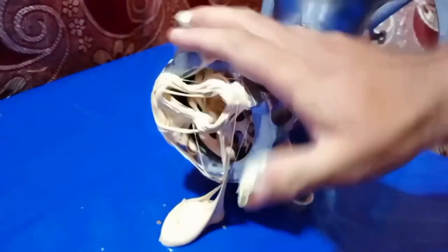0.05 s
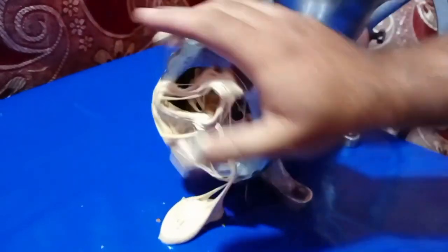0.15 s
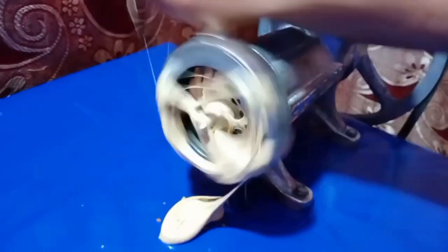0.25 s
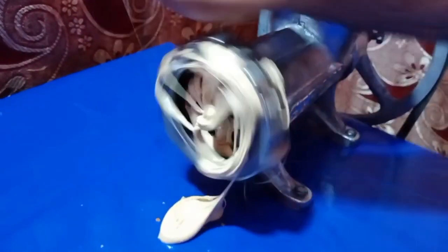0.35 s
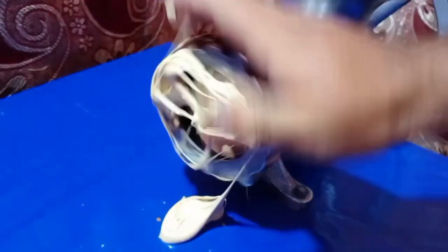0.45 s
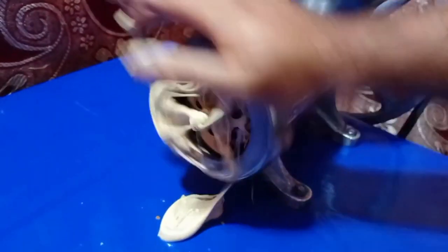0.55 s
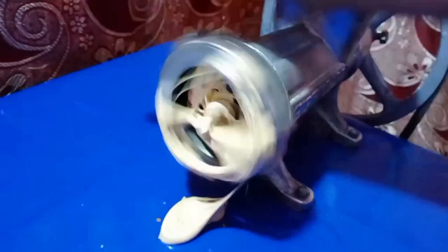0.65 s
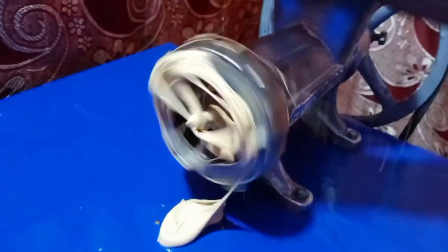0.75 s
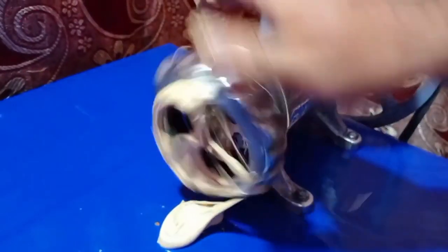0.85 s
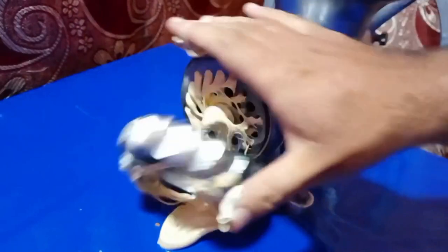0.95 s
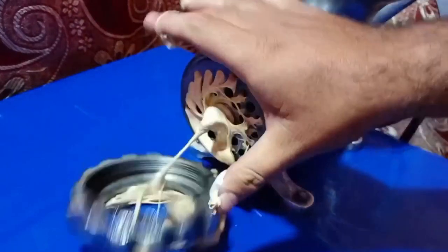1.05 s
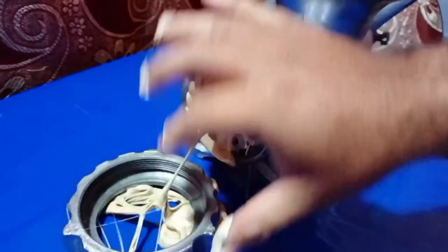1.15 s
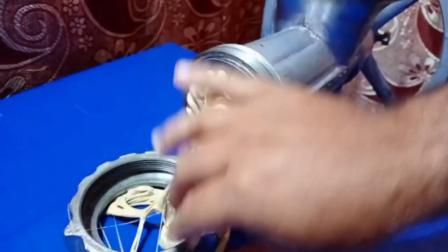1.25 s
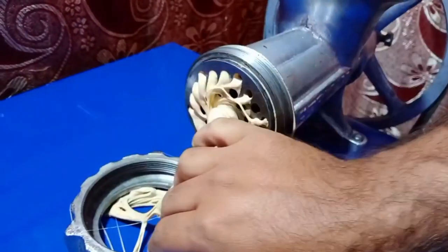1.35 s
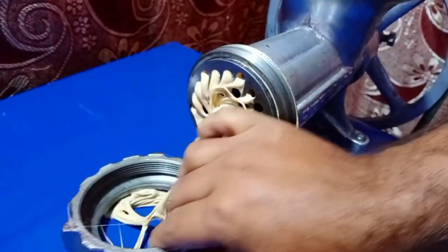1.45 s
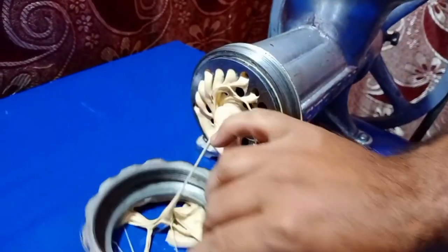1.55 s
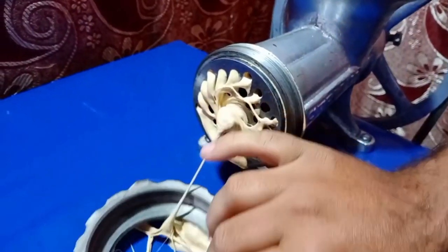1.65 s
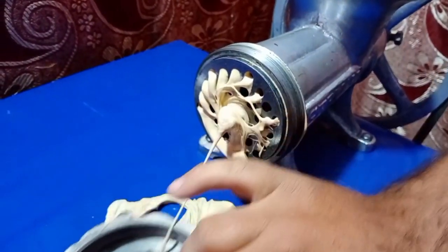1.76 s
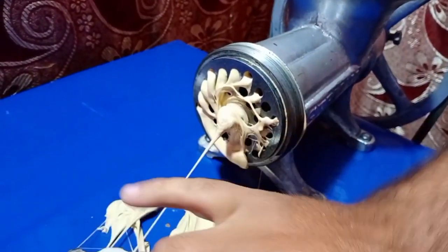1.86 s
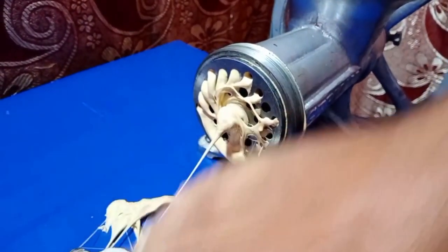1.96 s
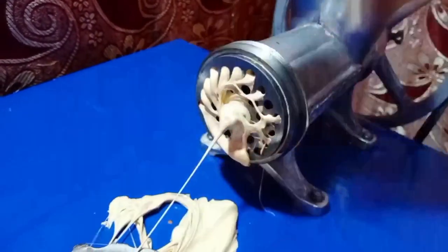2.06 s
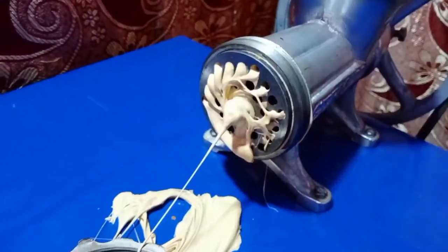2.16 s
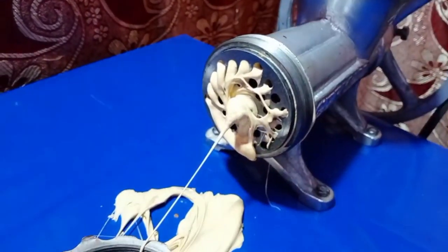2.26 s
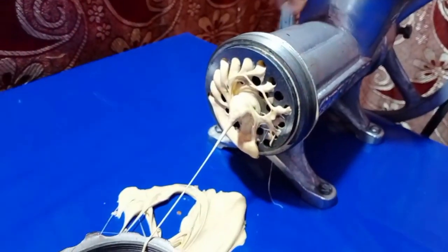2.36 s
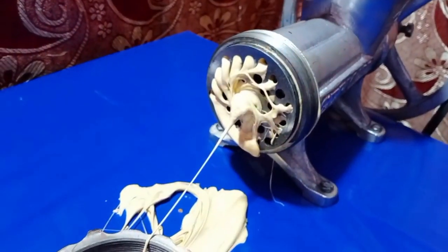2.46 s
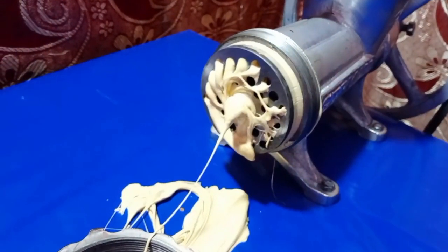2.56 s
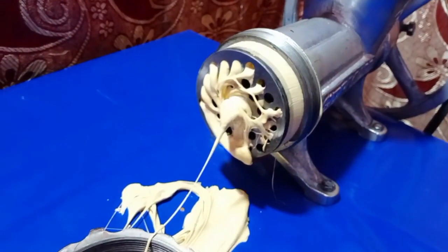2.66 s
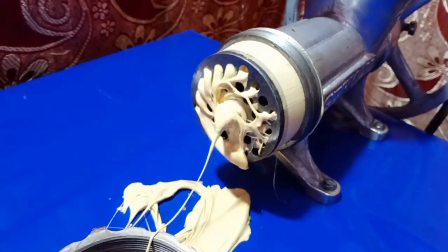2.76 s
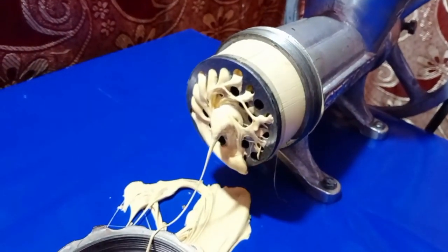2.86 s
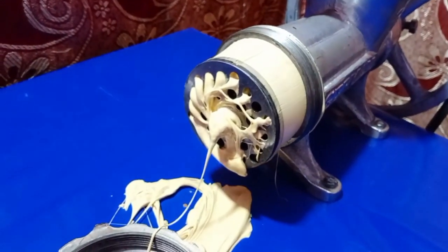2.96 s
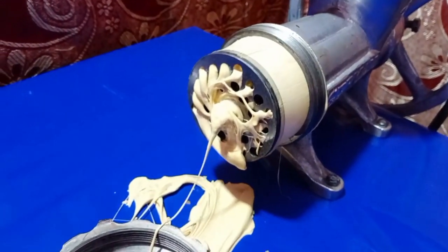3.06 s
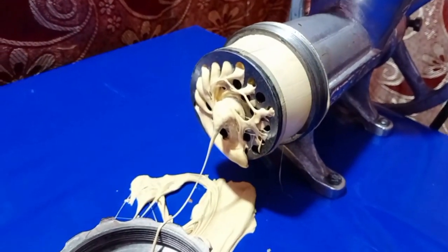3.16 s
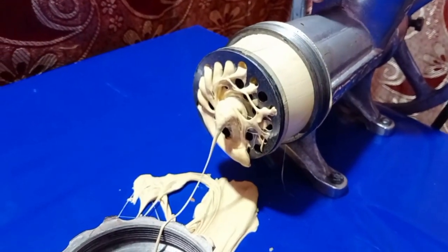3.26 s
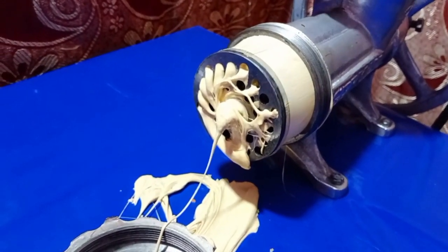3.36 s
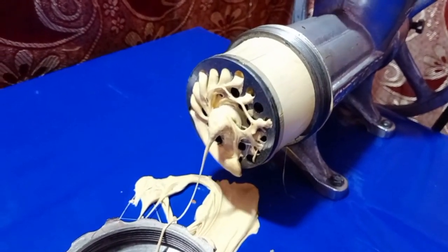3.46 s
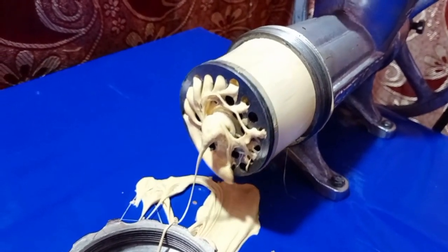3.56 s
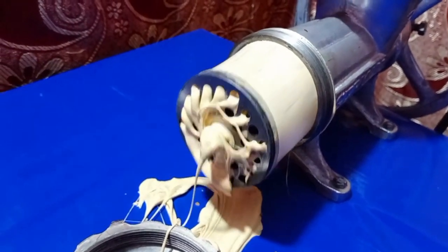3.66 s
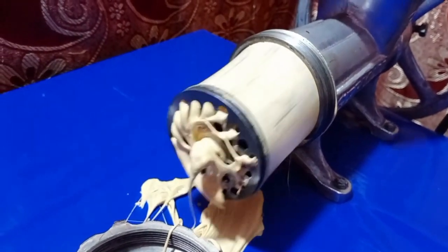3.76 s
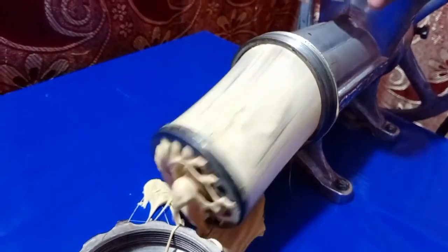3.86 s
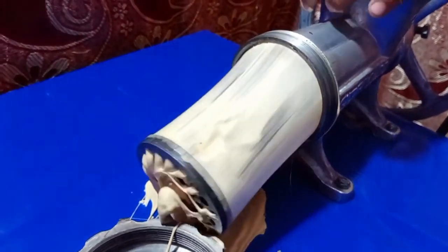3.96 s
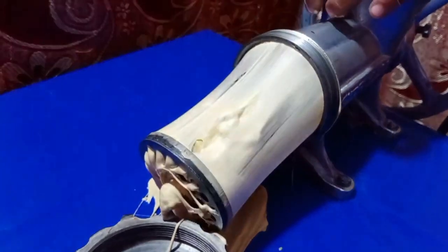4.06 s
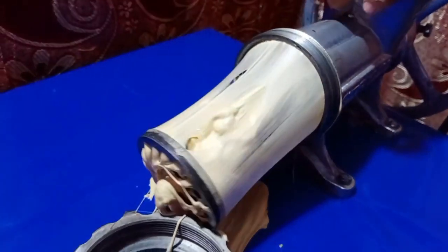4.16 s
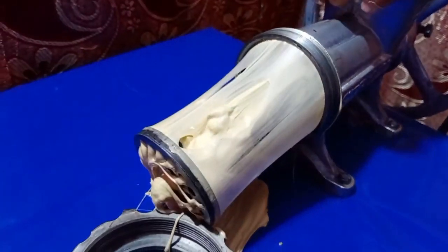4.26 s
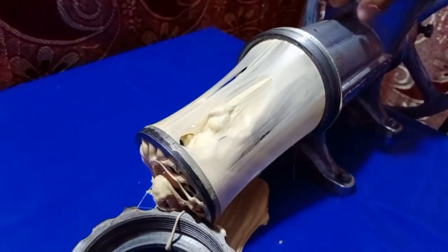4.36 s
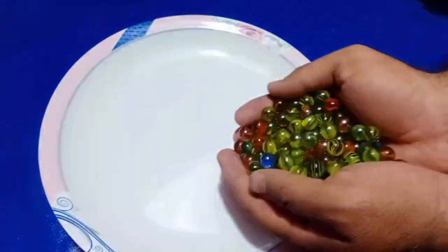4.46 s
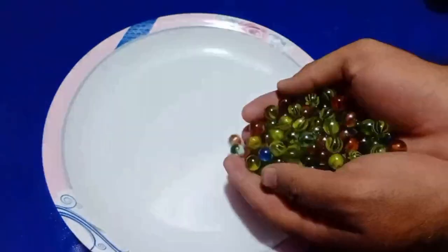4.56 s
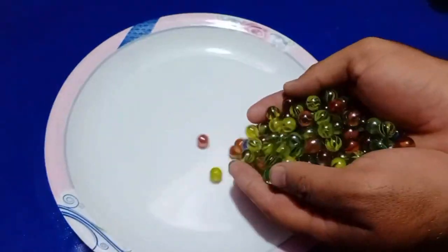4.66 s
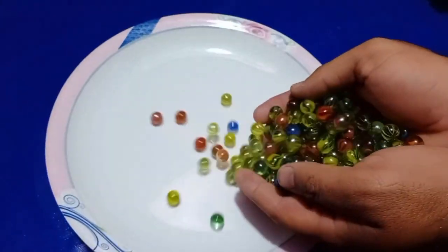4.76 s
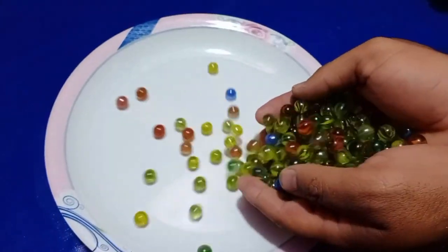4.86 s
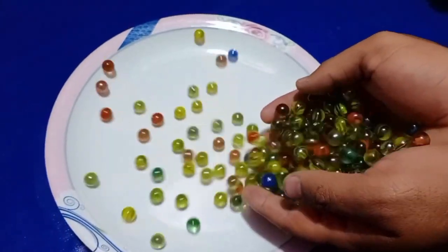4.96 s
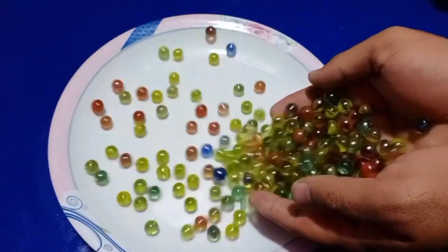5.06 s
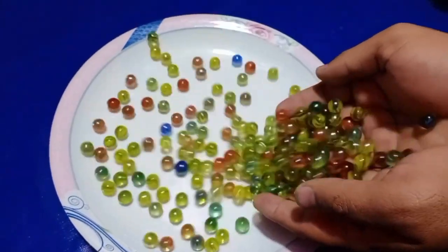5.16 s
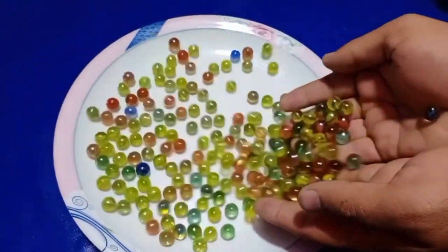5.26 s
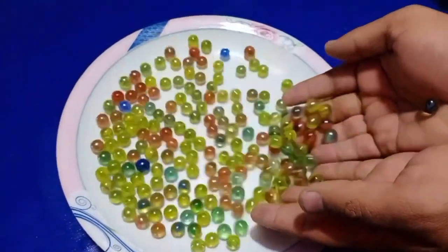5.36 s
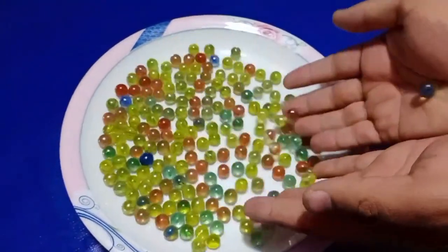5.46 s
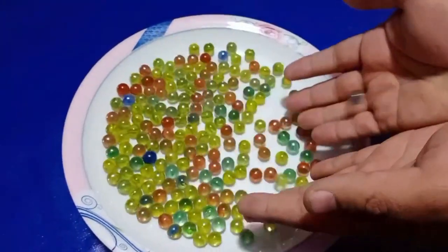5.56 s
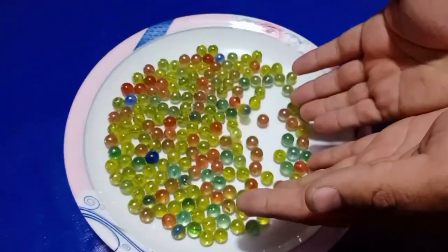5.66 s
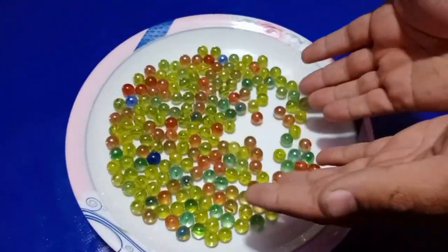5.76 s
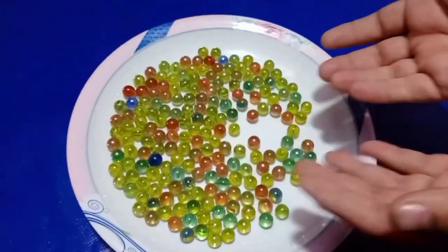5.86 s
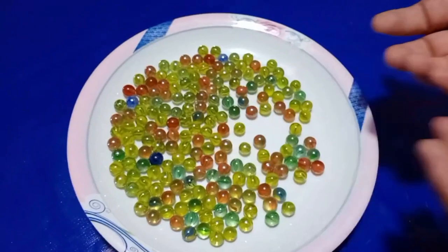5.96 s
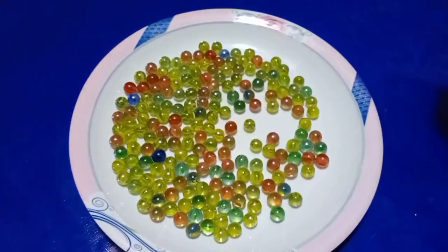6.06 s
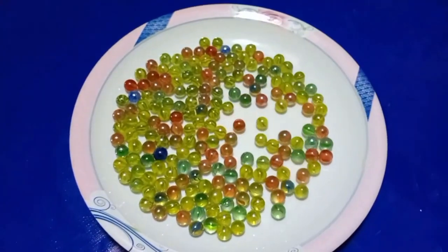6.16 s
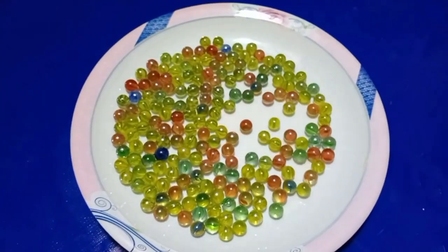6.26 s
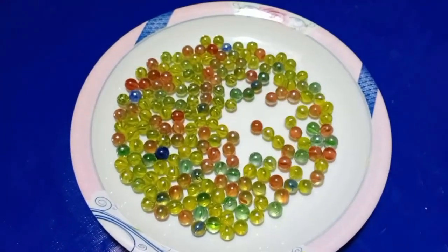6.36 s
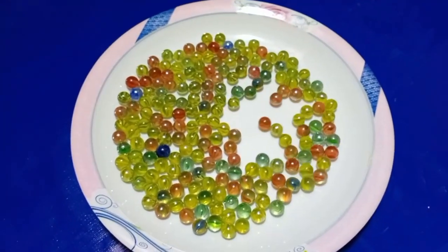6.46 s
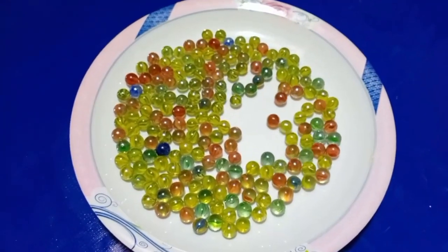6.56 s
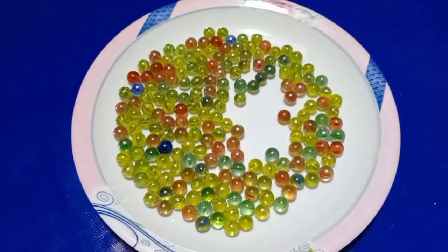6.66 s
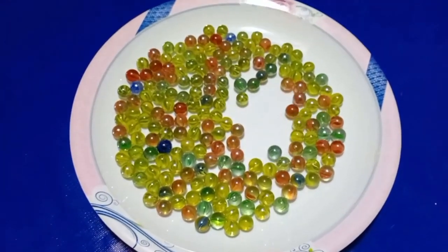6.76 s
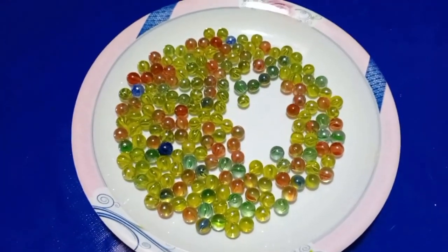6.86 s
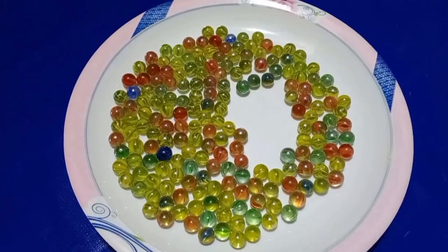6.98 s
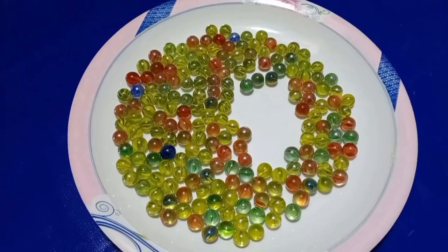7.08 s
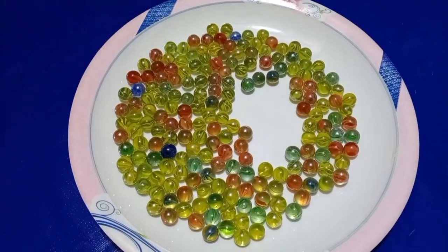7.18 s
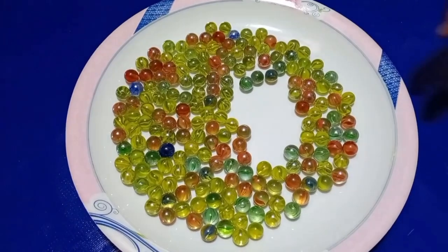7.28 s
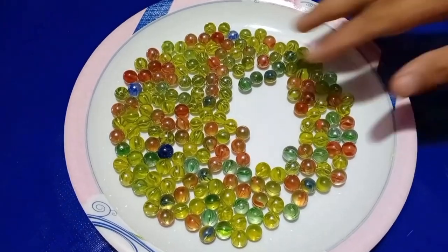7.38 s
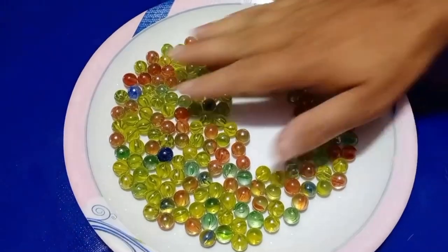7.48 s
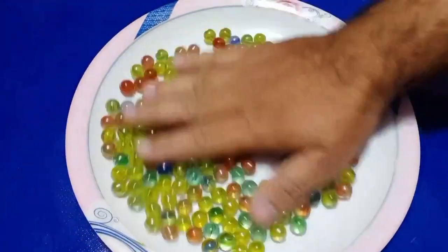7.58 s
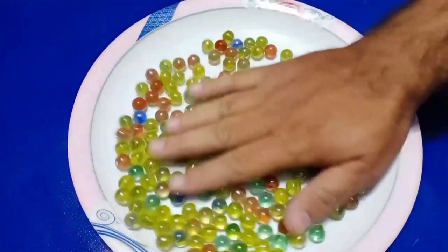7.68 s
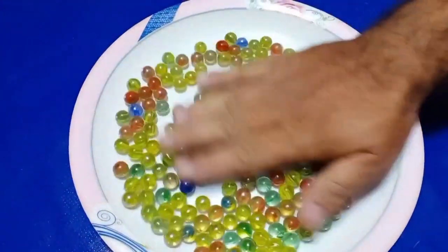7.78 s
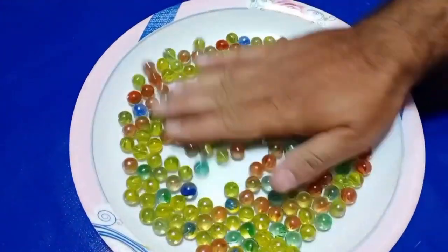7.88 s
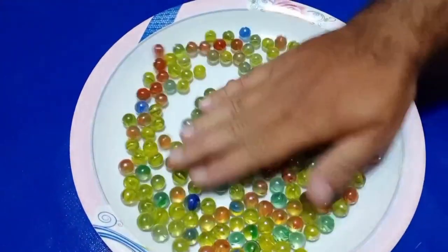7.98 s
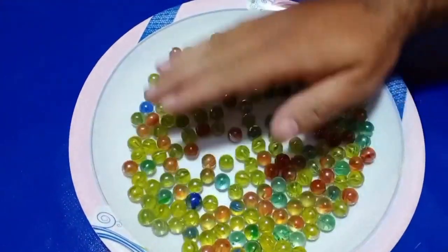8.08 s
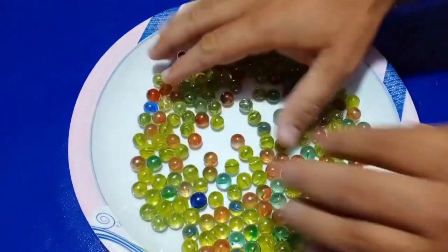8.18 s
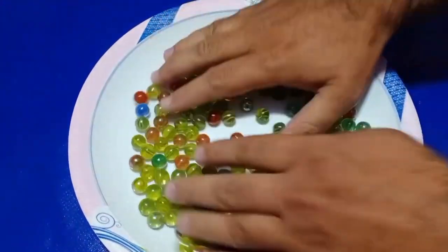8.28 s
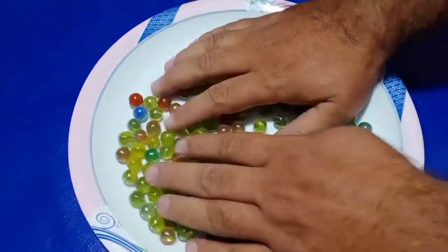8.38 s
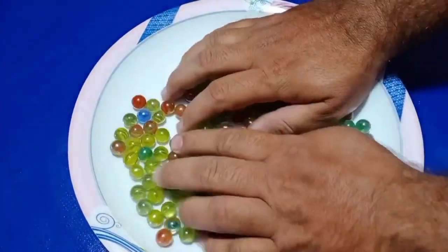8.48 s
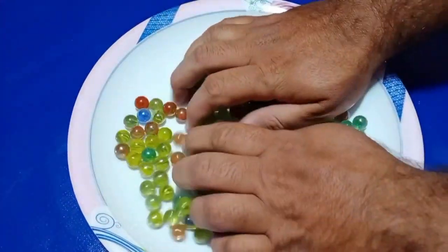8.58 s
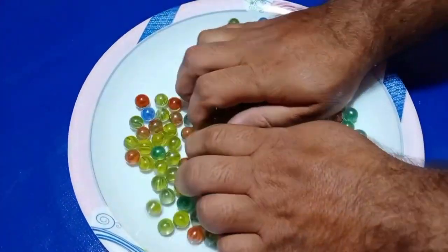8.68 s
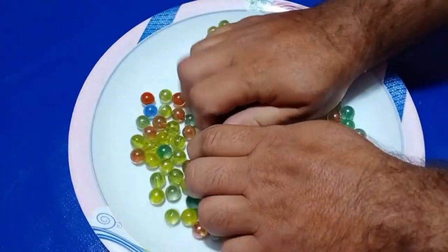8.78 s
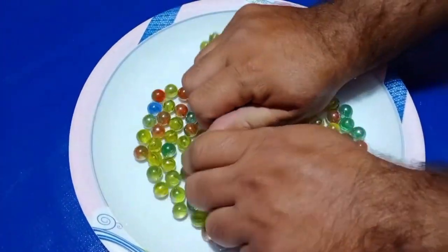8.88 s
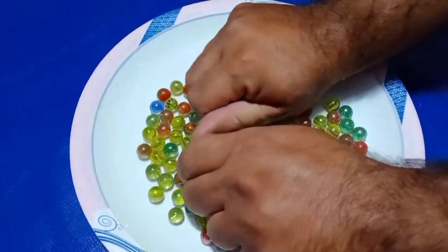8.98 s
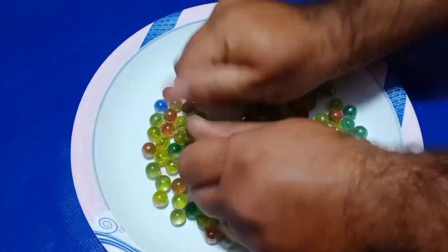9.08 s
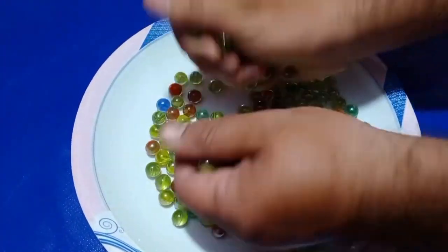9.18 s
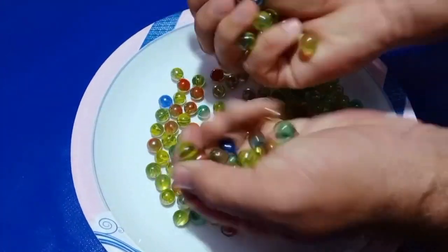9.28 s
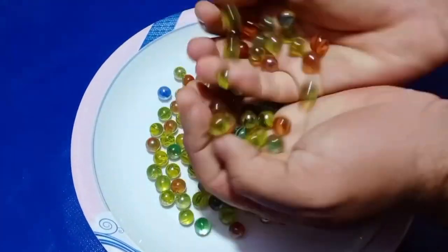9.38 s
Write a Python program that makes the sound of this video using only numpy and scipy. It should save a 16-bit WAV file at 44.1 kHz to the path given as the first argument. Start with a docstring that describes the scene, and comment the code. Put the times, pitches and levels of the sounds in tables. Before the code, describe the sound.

A small, lightly echoing room with a very faint noise floor. From 0 to 1 s a hand spins a metal ring in four or so short, slowing rasps with narrow metallic grating. Around 1.0 to 1.1 s it slips off with clanks and a high chime, then at 1.2 to 1.4 s hits the table with dull knocks, one hard thud and a short rattle; another thud comes at 1.8 s and a faint slide near 2. Thin dry squeaks lead at 2.5 into uneven cranking, 2.7 to 4.4 s: scraping, hollow barrel resonance, sharp metal knocks. At 4.5 s marbles shift in hands, then from 4.7 pour loudly onto a plate, dense and glassy, easing by 5.9. Tiny ticks and soft bumps fade to near-silence by 7. From 7.6 palms sweep the marbles in bursts, pausing around 8.2, then rub more coarsely with many hard clacks until about 9.4 s.

```python
"""In a small room, a hand spins the retaining ring off a cast metal meat grinder; the ring chimes
and drops on the table. The crank squeaks and grinds, then glass marbles pour from two hands onto
a plate, roll, settle and are stirred. Random contacts, noise bursts shaped by body resonances and
dying sines make the rubbing, rattling, knocking and ringing; wavering sines make the squeaks.
Echoes and a decaying tail add the room. Table levels are relative, before the layers' trims."""
import sys
import numpy as np
from scipy import signal
from scipy.io import wavfile
from scipy.ndimage import uniform_filter1d

SR = 44100
rng = np.random.default_rng(int(sys.argv[2]) if len(sys.argv) > 2 else 0)


def generate_wav(signal):
    """Clip the signal to [-1, 1] and save it as 16-bit WAV at the path in sys.argv[1]."""
    frames = np.transpose(np.atleast_2d(signal))
    scaled = np.clip(frames, -1, 1) * 32767
    pcm = np.round(scaled).astype(np.int16)
    wavfile.write(sys.argv[1], SR, pcm)


N = 415863
TIME = np.arange(N) / SR
TAPS = 4096  # length of a body's impulse response [samples]
HZ = np.fft.rfftfreq(TAPS, 1 / SR)


def amp(db):
    """Logarithmic level: decibels to amplitude gain."""
    return 10 ** (np.asarray(db) / 20)


def evened(x):
    """Normalization: scales to rms 1."""
    return x / np.sqrt(np.mean(x ** 2) + 1e-20)


def read(points, hz=HZ):
    """Interpolation: reads a spectrum on a log-frequency axis."""
    f, value = np.transpose(points)
    return np.interp(np.log(hz + 1), np.log(f + 1), value)


def add(mix, s, sound):
    """Superposition: mixes a sound in at time s."""
    part = mix[max(round(s * SR), 0):][:len(sound)]
    part += sound[:len(part)]


def lifts(resonances):
    """Resonance: the dB bumps that a body puts on a spectrum."""
    return sum(db / (1 + (2 * (HZ - hz) / width) ** 2) for hz, width, db in resonances)


def response(db):
    """Minimum phase: the causal impulse response of energy 1 with this dB spectrum."""
    log_gain = np.log(amp(np.maximum(db - db.max(), -100)))
    circle = np.concatenate([log_gain, log_gain[-2:0:-1]])
    h = np.fft.ifft(np.exp(np.conj(signal.hilbert(circle)))).real
    return h / np.linalg.norm(h)


def spot(uneven_db):
    """Mode selection: each place of contact favours other resonances, a random dB ripple over frequency."""
    ripple = uniform_filter1d(rng.standard_normal(len(HZ)), size=24)
    return uneven_db * evened(uniform_filter1d(ripple, size=24))


STROKE_RANGE_DB = 30  # climb during the rise, and fall during each stop time


def stroke(start, length, db, rise_s, stop_s, sag_db_per_s=0):
    """Envelope of one movement: its gain rises, holds or sags, and dies away after its length."""
    t = TIME - start
    away = np.maximum(1 - t / rise_s, 0) + np.maximum(t - length, 0) / stop_s
    heard = (t >= 0) & (away < 2)
    sag_db = sag_db_per_s * np.maximum(t[heard] - rise_s, 0)
    gain = np.zeros(N)
    gain[heard] = amp(db - STROKE_RANGE_DB * away[heard] - sag_db)
    return gain


def joined(gains):
    """Incoherent addition: overlapping movements add in power."""
    return np.sqrt(sum(gain ** 2 for gain in gains))


STICK_DB, SLIP_SIZE = 2.0, 600  # unevenness of the rubbing [dB rms]; smoothing of it [samples]


def judder():
    """Stick and slip: an uneven gain of rms 1."""
    uneven = uniform_filter1d(rng.standard_normal(N), size=SLIP_SIZE)
    uneven = uniform_filter1d(uneven, size=SLIP_SIZE // 2)
    return evened(amp(STICK_DB * evened(uneven)))


def contacts(gain, per_s, spread_db):
    """Random point process: times and forces of contacts whose rms follows gain."""
    at = np.flatnonzero((rng.random(N) < per_s / SR) & (gain > 1e-7))
    draw = rng.uniform(-1, 1, N)[at]
    force = np.zeros(N)
    force[at] = amp(spread_db * np.minimum(-np.log(np.abs(draw)), 3)) * np.sign(draw)
    local_power = np.abs(uniform_filter1d(force ** 2, size=1500)[at])
    return at, force[at] * gain[at] / np.sqrt(local_power + 1e-4)


def patter(gain, per_s, spread_db, body_db, count=8, uneven_db=2.5, spots_per_s=0):
    """Impact excitation: uneven contacts ring a body at several spots, at random or one after another."""
    first, last = np.flatnonzero(gain > 1e-7)[[0, -1]]
    at, force = contacts(gain, per_s, spread_db)
    place = rng.random(len(at))
    place = place + spots_per_s * at / SR if spots_per_s else place * count
    which = place.astype(int) % count
    out = np.zeros(N)
    for k in range(count):
        train = np.bincount(at - first, force * (which == k), last - first + 1)
        add(out, first / SR, signal.oaconvolve(train, response(body_db + spot(uneven_db))))
    return out


def blow(body_db, tilt, chatter, chatter_s):
    """Impulse response: one contact and its brief chatter ring a body; peak about 1."""
    t = np.arange(TAPS // 2) / SR
    burst = evened(rng.standard_normal(len(t)) * np.exp(-t / chatter_s))
    force = chatter * burst / np.sqrt(len(t))
    force[0] += 1
    tilt_db = tilt * np.log2(np.clip(HZ, 1300, 5000))
    sound = signal.fftconvolve(force, response(body_db + tilt_db))
    return sound / np.sqrt(4 * uniform_filter1d(sound ** 2, size=44).max())


def ringing(modes):
    """Modal decay: dying sines of a struck object, of alternating sign along the list."""
    t = np.arange(SR * 3 // 4) / SR
    return sum((-1) ** k * amp(db - 60 * t / t60) * np.sin(2 * np.pi * hz * t)
               for k, (hz, db, t60) in enumerate(modes))


CONTACT_S = .0003  # time that the chatter of a glass click takes to swell


def clicks(count, size=200):
    """Brief contact of glass: a sharp snap, then a millisecond of chatter, no two alike."""
    u = TIME[:size] / CONTACT_S
    bursts = rng.standard_normal((count, size)) * u * np.exp(-u)
    bursts /= np.linalg.norm(bursts, axis=1, keepdims=True)
    return np.sqrt(.5) * (bursts + (u == 0))


def clatter(gain, per_s, spread_db, body_db):
    """Granular collision: many marbles click, no two alike, and sound through a body."""
    at, force = contacts(gain, per_s, spread_db)
    bursts = force[:, None] * clicks(len(at))
    places = at[:, None] + np.arange(bursts.shape[1])
    train = np.bincount(places.ravel(), bursts.ravel(), N)
    return signal.oaconvolve(train, response(body_db))[:N]


# reverberation of the room: (frequency [Hz], time to fall by 60 dB [s])
ROOM_DECAY = [(100, 0.71), (260, .45), (700, .38), (2000, 0.3), (3200, 0.3), (6000, 0.04), (14000, 0.24)]


def room(x, wet_db, early_db, early_s, shifts_per_s, count=2):
    """Reverberation: early echoes and a tail with its own decay per band; paths shift if the source moves."""
    out, t = x.copy(), TIME[:SR * 2 // 3]
    for k in range(count):
        taps = rng.choice([-1., 1.], len(t)) * (rng.random(len(t)) < 1 / 10) * (t > .002)
        hz, s, z = signal.stft(taps, SR, nperseg=256)
        decay = amp(-60 * s / read(ROOM_DECAY, hz)[:, None])
        tail = signal.istft(z * decay, SR, nperseg=256)[1][:len(t)]
        early = rng.standard_normal(len(t)) * np.exp(-t / early_s)
        echoes = amp(wet_db) * tail / np.linalg.norm(tail) + amp(early_db) * early / np.linalg.norm(early)
        share = np.sqrt(2 / count) * np.cos(np.pi * (shifts_per_s * TIME + k / count))
        out += signal.oaconvolve(x * share, echoes)[:N]
    return out


# spectrum of the room noise: (frequency [Hz], level [dB])
AIR_SPECTRUM = [(30, -13), (85, 1), (130, -7.5), (300, -11), (600, -24.5), (1500, -21.5), (2800, -15.5),
                (4000, -25), (7000, -33), (15000, -38.5)]


def air():
    """Stationary noise: filtered random noise as the very faint sound of the room."""
    noise = signal.oaconvolve(rng.standard_normal(N), response(read(AIR_SPECTRUM)))[:N]
    return amp(-79) * evened(noise)


# rasp of the thread: (frequency [Hz], level [dB])
THREAD_SPECTRUM = [(80, -23), (250, -11), (550, -11.5), (800, -10.5), (1100, -6), (1500, -4.5),
                   (2100, -8.5), (2900, 1.5), (3450, .5), (4000, -17), (4800, -22.5), (6000, -38),
                   (9000, -56)]
# resonances of the thread: (frequency [Hz], width [Hz], lift [dB])
THREAD_RESONANCES = [(1100, 130, 8.5), (1490, 240, 6), (2577, 120, 3.5), (2947, 70, 4), (4300, 300, 5.5)]
# fine rasp of a fast spin: (frequency [Hz], level [dB])
FINE_RASP = [(2500, -31.5), (4200, 13), (4800, 7), (5700, -8.5), (7000, -13.5), (8000, -19.5), (11000, -37),
             (15000, -24.5)]
# the hand spins the ring: (start [s], length [s], level [dB], rise [s],
# fine rasp against the level [dB], first delay of the echo off the hand [ms])
SPINS = [(-0.03, 0.2297, -34, 0.0524, -13, 0.542), (0.294, 0.185, -42, 0.0307, -15, 0.358),
         (0.381, 0.242, -31, 0.053, -11.5, 0.563), (0.711, 0.183, -33.5, 0.0394, -9, 0.377),
         (0.829, 0.18, -28, 0.044, -14, 1.3), (1.026, 0.1105, -33, 0.0264, -24, 1.766)]
SPIN_SAG_DB_PER_S, SPIN_STOP_S = 21.5, 0.12  # friction slows the ring, then it stops
HAND_ECHO, HAND_MS_PER_S = .35, 5.5  # echo gain; the echo comes later as the hand follows through
GAP_S, GAP_LENGTH_S = 0.9, 0.013  # the rasp breaks off for a moment, then goes on
SLIDE_S, SLIDE_LENGTH_S, SLIDE_DB = 1.887, 0.1915, -61.5  # the ring is pushed aside


def retaining_ring():
    """Friction and comb filtering: each spin rasps on the thread and echoes off the hand; then a slide."""
    thread_db = read(THREAD_SPECTRUM) + lifts(THREAD_RESONANCES)
    spins = [stroke(s, length, db, rise_s, SPIN_STOP_S, SPIN_SAG_DB_PER_S)
             for s, length, db, rise_s, *_ in SPINS]
    rubbing = joined(spins) * judder()
    out = amp(-3.5) * patter(rubbing, 1500, 3.2, thread_db, count=16, uneven_db=3.5, spots_per_s=45)
    fine = joined(spin * amp(rasp_db) for spin, (*_, rasp_db, _) in zip(spins, SPINS))
    fine_db = read(FINE_RASP) + lifts([(5540, 200, 7), (6830, 1200, 12)])
    out += amp(-4.5) * patter(fine, 1500, 3.5, fine_db)
    # the echo off the moving hand sweeps a comb through the rasp
    delays_ms = [first_ms + HAND_MS_PER_S * (TIME - s) for s, *_, first_ms in SPINS]
    delay_s = sum(spin * ms for spin, ms in zip(spins, delays_ms)) / (sum(spins) + 1e-9) / 1000
    out += HAND_ECHO * np.interp(TIME - delay_s, TIME, out)
    out *= (TIME < GAP_S) | (TIME > GAP_S + GAP_LENGTH_S)
    slide = stroke(SLIDE_S, SLIDE_LENGTH_S, SLIDE_DB, 0.169, 0.0306)
    slide_db = read([(300, -2.5), (2000, 10.0), (5500, -9.5), (8000, -33.5)])
    return out + patter(slide, 570, 2.3, slide_db)


# ring and hand land on the table: (time [s], level [dB], hardness as a corner frequency [Hz])
THUDS = [(0.122, -40.5, 352.6), (1.031, -25, 2510), (1.284, -15, 2200), (1.323, -37, 1100),
         (1.358, -27, 902.6), (1.385, -25.5, 795), (1.64, -56, 4000), (1.798, -22.5, 1100),
         (1.962, -40, 397), (1.982, -40, 600), (2.059, -30.5, 277), (4.156, -37, 299.3),
         (4.214, -33, 297.7), (4.429, -38, 395)]
# modes of the table top: (frequency [Hz], level [dB], time to fall by 60 dB [s])
TABLE_MODES = [(84.2, -19.5, 0.62), (144.4, -12, 0.25), (250.3, -5, 0.11), (271.7, -4.5, 0.28),
               (325.7, -6, 0.084), (418.7, 5.5, 0.055), (464.6, -1.5, 0.055), (570, -4.5, 0.025),
               (751.4, -12.5, 0.15), (868, -26, 0.36), (1081, -5.5, 0.061)]


def table():
    """Modal excitation: a dull crack plus the table top's modes; softer blows lose their treble."""
    out, modes = np.zeros(N), ringing(TABLE_MODES)
    crack_db = read([(70, -5.5), (250, -3), (1100, -2.0), (3000, -8.5), (4200, -13.5), (12000, -42.0)])
    for s, db, corner_hz in THUDS:
        sound = 0.43 * modes / np.abs(modes).max()
        add(sound, 0, blow(crack_db, 0, 1.0, 0.0095))
        sound = signal.lfilter(*signal.butter(2, min(corner_hz, SR / 4), fs=SR), sound)
        add(out, s, amp(db + 2.5) * sound / np.abs(sound).max())
    return out


# metal catches and grates, on the thread and then in the barrel:
# (start [s], length [s], level [dB], centre [Hz], half-width [Hz])
GRATES = [(0.471, 0.086, -38, 3154, 508), (0.436, 0.0245, -49, 6773, 251.5), (0.861, 0.045, -39, 2936, 596),
          (0.958, 0.042, -32.5, 2915, 450), (0.975, 0.071, -50, 7066, 129), (2.557, 0.17, -67, 2820, 696),
          (4.068, 0.1572, -39, 2563, 751)]
GRATE_RISE_S, GRATE_STOP_S, GRATE_LIFT_DB = .025, 0.037, 38.5


def grating():
    """Resonant friction: dense slips of metal on metal ring one narrow resonance."""
    out = np.zeros(N)
    for s, length, db, hz, half_width in GRATES:
        gain = stroke(s, length, db, GRATE_RISE_S, GRATE_STOP_S)
        body_db = lifts([(hz, 2 * half_width, GRATE_LIFT_DB)])
        body_db = body_db + read([(0.96 * hz, 0), (1.1 * hz, -12), (3 * hz, -32)])
        out += patter(gain, 2500, 1.5, body_db, count=2)
    return out


# modes of the free ring: (frequency [Hz], level [dB], time to fall by 60 dB [s])
RING_MODES = [(2579, 0, .42), (2598, -8, .42), (2930, -11, .24), (6702, -16, .28), (6720, -24, .28),
              (6982, -23, .2)]
# the ring slips off and is struck: (time [s], chime level [dB], clank level [dB])
CHIMES = [(0.98, -36, -28), (1.031, -41.5, -14.5), (1.076, -22.5, -17), (1.193, -55.5, -29.5),
          (1.256, -53.5, -30), (1.283, -49.5, -20.5)]
LANDED_S, LANDED_DB_PER_S = 1.2, 150  # once it lies on the table the ring is damped


def chimes():
    """Modal beating: the freed ring clanks on the barrel and its paired modes ring on until it lands."""
    out, tone = np.zeros(N), ringing(RING_MODES[::2]) + ringing(RING_MODES[1::2])
    tone *= 1 - np.exp(-TIME[:len(tone)] / 0.001)  # the modes take a moment to build
    for s, chime_db, _ in CHIMES:
        add(out, s, amp(chime_db) * tone)
    out *= amp(-LANDED_DB_PER_S * np.maximum(TIME - LANDED_S, 0))
    clank_body_db = read(THREAD_SPECTRUM) + lifts([(1600, 470, 11), (6940, 700, 14)])
    for s, _, clank_db in CHIMES:
        add(out, s, amp(clank_db) * blow(clank_body_db + spot(4.3), 0, 1.2, 0.0087))
    return out


# dull knocks as the paste-coated ring touches down: (time [s], level [dB], pitch [Hz])
DULL_KNOCKS = [(1.192, -25, 409), (1.211, -21, 440.5), (1.254, -17.5, 381.7), (1.263, -23, 318.5)]
DULL_RISE_S, DULL_T60_S = .002, .055


def touch_down():
    """Damping: the paste deadens the ring's first knocks on the table to a few low cycles."""
    out, t = np.zeros(N), TIME[:SR // 5]
    for s, db, hz in DULL_KNOCKS:
        swing = np.sin(2 * np.pi * hz * t)
        swing += .4 * np.sin(2 * np.pi * 1.2 * hz * t)
        swing += 0.5 * np.sin(2 * np.pi * 0.75 * hz * t)
        sound = swing * (1 - np.exp(-t / DULL_RISE_S)) * amp(-60 * t / DULL_T60_S)
        add(out, s, amp(db) * sound / np.abs(sound).max())
    return out


# spectrum of the rattling ring: (frequency [Hz], level [dB])
WOBBLE_SPECTRUM = [(200, -10.5), (420, 7.5), (900, 11.5), (1500, 3), (2700, 3), (4000, -22), (9000, -60.5)]
WOBBLE_S, WOBBLE_LENGTH_S, WOBBLE_DB, WOBBLE_STOP_S = 1.275, 0.0814, -37, 0.1952


def wobble():
    """Repeated impact: the fallen ring rattles on its rim before it lies still."""
    gain = stroke(WOBBLE_S, WOBBLE_LENGTH_S, WOBBLE_DB, 0.0099, WOBBLE_STOP_S)
    return patter(gain, 384, 2.4, read(WOBBLE_SPECTRUM))


SQUEAK_WAVER, SQUEAK_EDGE_S = 0.007, 0.016  # rms share of the pitch; fade in and out


def thin_tones(rows, rise_per_s=0):
    """Frequency modulation: thin, slightly wavering tones that fade in and out."""
    out = np.zeros(N)
    for s, length, hz, db in rows:
        t = np.arange(0, length, 1 / SR)
        waver = SQUEAK_WAVER * evened(uniform_filter1d(rng.standard_normal(N)[:len(t)], size=300))
        tone = np.sin(2 * np.pi * np.cumsum(hz * (1 + waver + rise_per_s * t)) / SR)
        fade = np.minimum(np.minimum(t, length - t) / SQUEAK_EDGE_S, 1)
        add(out, s, amp(db) * evened(tone) * fade)
    return out


# squeaks of the dry shaft: (start [s], length [s], mean pitch [Hz], level [dB])
SQUEAKS = [(2.11, 0.0474, 7040, -70.5), (2.31, 0.2, 2860, -76.5), (2.49, 0.09, 3080, -59.5),
           (2.585, 0.055, 3156, -56.5), (2.635, .07, 3120, -62), (2.62, 0.0822, 2640, -57.5)]


def squeaks():
    """Frictional oscillation: the dry shaft squeaks in wavering tones."""
    return thin_tones(SQUEAKS)


# spectrum of the barrel: (frequency [Hz], level [dB])
BARREL_SPECTRUM = [(35, -41.5), (60, -13), (81, -1), (212, -10), (268, 5.5), (362, -2), (479, 1.5),
                   (593, -3), (853, -4.5), (1250, -13.5), (1520, -6.5), (2050, -16.5), (2490, -12.5),
                   (3220, -19.5), (10000, -73), (13000, -103), (22000, -120)]
# resonances of the casting: (frequency [Hz], width [Hz], lift [dB])
CASTING_RESONANCES = [(875.3, 47, 6), (1105.4, 150, 10.5), (1459.7, 210, 6.5), (2580, 230, 5.5),
                      (2826, 570, 5.5), (3330, 330, 4.5), (6588, 300, 7.5)]
# pushes on the crank: (start [s], length [s], level [dB], rise [s])
PUSHES = [(2.682, 0.1063, -36, 0.0485), (2.87, 0.102, -30, 0.0145), (2.809, 0.311, -32, 0.0697),
          (3.201, 0.0245, -41.5, 0.041), (3.304, 0.015, -31.5, 0.03), (3.515, 0.17, -38, 0.0613),
          (3.605, 0.1984, -34.5, 0.053), (3.848, 0.178, -25.5, 0.0836), (4.021, 0.2292, -31.5, 0.037),
          (4.357, 0.0685, -29, 0.0387)]
# metal knocks in the grinder: (time [s], level [dB], brightness [dB per octave])
KNOCKS = [(2.88, -14, 4), (2.891, -18, 5.5), (2.912, -21.5, -0.5), (3.105, -24, 6), (3.239, -45.5, -5.5),
          (3.311, -31, -12), (3.527, -21, -4.5), (3.577, -31, -11.5), (3.642, -24.5, -7.5),
          (3.688, -33, 8.5), (3.791, -19, -1.5), (3.935, -19.5, 5.5), (3.963, -23, -2), (3.987, -21, -2),
          (4.024, -20.5, 5), (4.062, -17, -1.5), (4.083, -25, 1), (4.094, -17, 2), (4.157, -16.5, 1),
          (4.374, -30, -2.5), (4.397, -33.5, 5.5)]
PUSH_STOP_S = 0.077
# slips a second of the screw; spread of their force [dB]; ripple from spot to spot [dB]
SCRAPE_PER_S, SCRAPE_SPREAD_DB, SCRAPE_RIPPLE_DB = 1000, 2.3, 2.2


def grinder():
    """Friction and impact: with each push the screw scrapes and knocks in the resonant cast barrel."""
    body_db = read(BARREL_SPECTRUM) + lifts(CASTING_RESONANCES)
    scraping = joined(stroke(*row, PUSH_STOP_S) for row in PUSHES) * judder()
    out = amp(-8.5) * patter(scraping, SCRAPE_PER_S, SCRAPE_SPREAD_DB, body_db,
                             count=12, uneven_db=SCRAPE_RIPPLE_DB, spots_per_s=22)
    knock_db = body_db + read([(150, -14.0), (1200, 4.0)])
    for s, db, tilt in KNOCKS:
        add(out, s, amp(db + 2.5) * blow(knock_db + spot(SCRAPE_RIPPLE_DB), tilt, 2.06, 0.0044))
    return out


# poured marbles: (frequency [Hz], level [dB])
POURED_SPECTRUM = [(60, -44.5), (130, -30), (260, -25), (560, -33.5), (800, -23), (1100, -12.5),
                   (1600, -12), (2300, -5.5), (2600, -3.5), (3200, -0.5), (4600, -7.5), (6100, -10.5),
                   (7700, -20), (8600, -21.5), (11000, -33.5), (15000, -26.5)]
# resonances of the plate: (frequency [Hz], width [Hz], lift [dB])
PLATE_RESONANCES = [(420, 106, 13), (680, 60, 5), (1190, 170, 10), (1995, 90, 11), (2900, 60, 12),
                    (3050, 90, 7), (3440, 45, 5), (3725, 90, 6), (4265, 110, 10), (4960, 150, 10),
                    (5730, 170, 8), (6150, 300, 9), (6950, 550, 9)]
# glass on glass: (frequency [Hz], level [dB])
GLASS_SPECTRUM = [(60, -26.5), (130, -26.5), (250, -11.5), (330, -17), (430, -14), (620, -25.5),
                  (1100, -12.5), (2000, -4.5), (4000, 2.5), (5400, -1), (6500, -3.5), (8000, -19),
                  (11000, -30), (15000, -18)]
# whirr of rolling marbles: (frequency [Hz], level [dB])
WHIRR_SPECTRUM = [(300, -5.5), (900, -26.5), (1700, -8), (3000, 0.5), (4000, -8.5), (5500, -38),
                  (12000, -22)]
# the hands open, the flow builds, holds, and dies away once they are empty
OPEN_S, CUPPED_DB = 4.51, -47.5
POUR_S, EMPTY_S, POUR_LEVEL_DB = 4.688, 5.58, -24
# share of the full flow at first; its full growth takes BUILD_S; time constant of the end
FIRST_FLOW, BUILD_S, DRAIN_S = 0.17, .33, 0.045
JOSTLE_END_S, JOSTLE_DB, JOSTLE_STOP_S = 5.928, -35.5, 0.158  # the heap keeps jostling after the pour
ROLL_S, ROLL_END_S, ROLL_DB, ROLL_SAG_DB_PER_S = 6.07, 6.37, -64, 5  # the last marbles whirr to rest
# collisions a second at no flow, and added at full flow; spread of their force [dB]
FEW_PER_S, FULL_PER_S, POUR_SPREAD_DB = 500, 1500, 1.6
# scale of the resonances on the bare and the covered plate; covered by this time
BARE_RING, LOADED_RING, LOAD_S = 1.306, 0.793, 5.3


def pour():
    """Mass loading: marbles shift in the hands, rain on a plate that dulls as they cover it, and roll."""
    shifting = stroke(OPEN_S, POUR_S - OPEN_S, CUPPED_DB, 0.065, 0.0294)
    held_db = read(GLASS_SPECTRUM) + read([(1000, 2.7), (7000, 4.1), (14000, 21.0)])
    held = patter(shifting, 900, 3.3, held_db)
    flow = np.minimum(FIRST_FLOW + (TIME - POUR_S) / BUILD_S, 1)
    flow = flow * np.exp(-np.maximum(TIME - EMPTY_S, 0) / DRAIN_S)
    flow = np.maximum(flow, 0) * (TIME >= POUR_S) * (TIME < JOSTLE_END_S)
    jostle = stroke(EMPTY_S, JOSTLE_END_S - EMPTY_S, JOSTLE_DB, 0.03, JOSTLE_STOP_S)
    loudness = joined([amp(POUR_LEVEL_DB) * np.sqrt(flow), jostle])
    per_s = FEW_PER_S + FULL_PER_S * flow
    covered = np.clip((TIME - POUR_S) / (LOAD_S - POUR_S), 0, 1)
    falling = np.zeros(N)
    for share, ring in [(1 - covered, BARE_RING), (covered, LOADED_RING)]:
        body_db = read(POURED_SPECTRUM) + ring * lifts(PLATE_RESONANCES)
        falling += clatter(loudness * np.sqrt(share), per_s, POUR_SPREAD_DB, body_db)
    roll = stroke(ROLL_S, ROLL_END_S - ROLL_S, ROLL_DB, 0.037, 0.56, ROLL_SAG_DB_PER_S)
    rolling = patter(roll, 2500, 1.53, read(WHIRR_SPECTRUM))
    return amp(-3.5) * held + amp(-1.5) * falling + amp(-7.0) * rolling


# single hard clacks of glass: (time [s], level [dB])
CLACKS = [(4.608, -35), (4.688, -9.5), (4.696, -15), (4.729, -13), (4.751, -15), (4.774, -15),
          (4.794, -14.5), (4.813, -17), (4.845, -17), (5.603, -16), (5.625, -14), (5.653, -15),
          (5.681, -16), (5.704, -14), (5.729, -14), (5.78, -17), (5.823, -19), (5.842, -15), (5.905, -13),
          (7.626, -24), (7.661, -17), (7.688, -17), (7.705, -15), (7.844, -21), (7.865, -19), (7.921, -18),
          (8.104, -20), (8.13, -21), (8.15, -19), (8.288, -34), (8.429, -15), (8.466, -16), (8.512, -22),
          (8.556, -17), (8.601, -18), (8.661, -15), (8.692, -16), (8.729, -14), (8.747, -15), (8.798, -16),
          (8.856, -16.5), (8.871, -16), (8.888, -17), (8.931, -16), (8.976, -16), (9.011, -16),
          (9.024, -15), (9.089, -17), (9.101, -15), (9.123, -20), (9.155, -15), (9.215, -13), (9.221, -17),
          (9.247, -18), (9.261, -14), (9.299, -15), (9.305, -16), (9.327, -20), (9.346, -19), (9.402, -18)]
# spectrum of a clack: (frequency [Hz], level [dB])
CLACK_SPECTRUM = [(100, -24), (600, -22), (1000, -3.5), (1600, 2), (3000, 4.5), (5500, -0.5), (7000, -9.5),
                  (8500, -17.5), (11000, -30.5), (15000, -26)]
CLACK_GAIN_DB = 1


def single_marbles():
    """Impulse excitation: hard clacks of glass on the plate stand out of the clatter."""
    out, plate = np.zeros(N), response(read(CLACK_SPECTRUM) + 0.54 * lifts(PLATE_RESONANCES))
    for (s, db), click in zip(CLACKS, clicks(len(CLACKS))):
        sound = np.convolve(click, plate)
        add(out, s, amp(db + CLACK_GAIN_DB) * sound / np.abs(sound).max())
    return out


# soft low bumps, one just before the pour, the rest as marbles roll to rest: (time [s], level [dB])
BUMPS = [(4.622, -39), (6.176, -43), (6.219, -50), (6.243, -53), (6.275, -45.5), (6.298, -48.5),
         (6.342, -53.5), (6.346, -38.5), (6.562, -42), (6.593, -45.5), (6.815, -56.5), (6.846, -39),
         (6.866, -43), (6.927, -57)]
# spectrum of a bump: (frequency [Hz], level [dB])
BUMP_SPECTRUM = [(47, -32), (80, -3), (150, -1.5), (317, -2.5), (760, -14.5), (971, -28), (1120, -23.5),
                 (1300, -30.5), (1690, -35), (2860, -120)]
# palms land on the heap: (time [s], level [dB])
PALMS = [(7.63, -38.5), (8.301, -40.5), (8.387, -38.5), (8.587, -39)]
RUMBLE_DB, RUMBLE_RISE_S, RUMBLE_STOP_S = -15.5, 0.026, 0.063  # rumble around each bump, against its level


def soft_bumps():
    """Soft contact: low bumps, each in a brief rumble, and landing palms sound without a clear ring."""
    bump_db = read(BUMP_SPECTRUM)
    rumble = joined(stroke(s - RUMBLE_RISE_S, RUMBLE_RISE_S, db + RUMBLE_DB, RUMBLE_RISE_S, RUMBLE_STOP_S)
                    for s, db in BUMPS)
    out = patter(rumble, 400, 3.9, bump_db, count=3)
    for s, db in BUMPS:
        add(out, s, amp(db + 1.5) * blow(bump_db, 0, 0.263, 0.0045))
    palm_db = read([(70, -2.5), (130, 10.5), (280, -35.5), (600, -21.5), (2000, -50.5)])
    for s, db in PALMS:
        add(out, s, amp(db - 3.0) * blow(palm_db, 0, 0.82, 0.036))
    return out


# a straggler nudges its neighbours, a short run of tiny ticks: (time [s], level [dB])
NUDGES = [(6.085, -47), (6.218, -42), (6.223, -47.5), (6.257, -46.5), (6.355, -53), (6.456, -40.5),
          (6.467, -42), (6.493, -42), (6.522, -51.5), (6.552, -48.5), (6.605, -51.5), (6.657, -53.5),
          (6.709, -47), (6.828, -58.5), (6.843, -49.5), (6.92, -60)]
# one marble touches another: (frequency [Hz], level [dB])
TICK_SPECTRUM = [(100, -30), (1000, -21), (1800, -8), (2800, 2), (3600, 5), (4500, -0.5), (5600, 0.5),
                 (7000, -10.5), (8500, -20.5), (11000, -18.5), (15000, -8.5)]
# the covered plate answers a tick: (frequency [Hz], width [Hz], lift [dB])
TICK_RESONANCES = [(2765, 130, 15), (2950, 130, 14), (4500, 220, 7)]
TICK_RING_FROM_DB, TICK_RING_FULL_DB = -54, -44  # only the harder ticks make the plate ring
NUDGE_GAIN_DB = 2.5
NUDGE_RUN_S, NUDGE_FALL_DB = .022, 14.5  # span of a run of ticks, and the fade over that span


def stragglers(count=4):
    """Successive collision: late marbles set off short runs of ticks, and the plate rings faintly."""
    out = np.zeros(N)
    for s, db in NUDGES:
        ring = np.interp(db, [TICK_RING_FROM_DB, TICK_RING_FULL_DB], [0, 1])
        body = response(read(TICK_SPECTRUM) + ring * lifts(TICK_RESONANCES) + spot(4.2))
        order = np.arange(count)
        lateness = (order + rng.random(count) * (order > 0)) / count
        for late, click in zip(lateness, clicks(count)):
            sound = np.convolve(click, body)
            tick_db = db + NUDGE_GAIN_DB - NUDGE_FALL_DB * late
            add(out, s + NUDGE_RUN_S * late, amp(tick_db) * sound / np.abs(sound).max())
    return room(out, wet_db=-6, early_db=-7, early_s=0.007, shifts_per_s=0)


# faint chirps before the stirring: (start [s], length [s], starting pitch [Hz], level [dB])
CHIRPS = [(7.255, 0.064, 2500, -77.5), (7.29, 0.065, 5340, -86), (7.43, 0.1, 6370, -82.5),
          (7.48, 0.046, 3250, -82), (7.51, 0.082, 6675, -86), (7.52, 0.071, 5050, -86)]
CHIRP_RISE_PER_S = .55  # share of the starting pitch


def chirps():
    """Frequency glide: faint wavering tones rise in pitch."""
    return thin_tones(CHIRPS, CHIRP_RISE_PER_S)


# low ring of the plate under pressure: (frequency [Hz], level [dB])
PRESSED_SPECTRUM = [(600, -25.5), (900, -10.5), (1150, 2), (1600, 9), (2100, 6.5), (3000, 9.5), (5000, -79)]
# sweeps of the palms through the heap: (start [s], length [s], level [dB], rise [s],
# pressure as the plate's low ring against the level [dB])
SWEEPS = [(7.604, 0.1057, -33.5, 0.0225, -14.5), (7.741, 0.066, -32.5, 0.0296, -17.5),
          (7.832, 0.0546, -31, 0.0266, -17), (7.887, 0.176, -31, 0.0484, -17),
          (8.1, 0.0272, -39, 0.0285, -12), (8.279, 0.1, -47, 0.0228, -20),
          (8.349, 0.193, -38, 0.0351, -3.5), (8.534, 0.35, -31.5, 0.04795, -1),
          (8.9, 0.099, -33.5, 0.031, 0.5), (8.991, 0.2016, -38, 0.031, 1),
          (9.16, 0.173, -34.5, 0.0443, -3.5)]
SWEEP_SAG_DB_PER_S, SWEEP_STOP_S = -1.5, 0.24  # a negative sag: each sweep grows
# contacts a second under a light palm and a heavy one; spread of their force [dB]
SLIDING_PER_S, PRESSED_PER_S, STIR_SPREAD_DB = 2400, 800, 2.9


def stir():
    """Contact pressure: palms rub glass on glass; pressing coarsens it and brings out the low ring."""
    sweeps = [stroke(s, length, db, rise_s, SWEEP_STOP_S, SWEEP_SAG_DB_PER_S)
              for s, length, db, rise_s, _ in SWEEPS]
    loudness = joined(sweeps)
    pressure = joined(sweep * amp(row[-1]) for sweep, row in zip(sweeps, SWEEPS))
    per_s = np.interp(pressure / (loudness + 1e-9), [0, 1], [SLIDING_PER_S, PRESSED_PER_S])
    glass = clatter(loudness, per_s, STIR_SPREAD_DB, read(GLASS_SPECTRUM))
    low_ring = clatter(pressure * judder(), PRESSED_PER_S, STIR_SPREAD_DB, read(PRESSED_SPECTRUM))
    return amp(-0.5) * glass + amp(-5.5) * low_ring


def scene():
    """Direct and reverberant sound: the grinder stands farther off than the plate and the touch-down."""
    machine = retaining_ring() + table() + grating() + wobble() + squeaks() + grinder()
    machine = room(machine, wet_db=-5.0, early_db=-5.0, early_s=0.0037, shifts_per_s=2.0027)
    near = touch_down() + pour() + single_marbles() + chirps() + stir()
    near = room(near, wet_db=-8, early_db=-11, early_s=0.007, shifts_per_s=0)
    return (machine + near + stragglers() + chimes() + soft_bumps() + air())[None]


EDGE_HZ = 15700  # upper band limit


def record(dry):
    """Band limitation: the microphone's bass roll-off and the recorder's upper limit."""
    thinned = signal.sosfilt(signal.butter(3, 68, "highpass", fs=SR, output="sos"), dry)
    lowpass = signal.firwin(511, EDGE_HZ, window=("kaiser", 9), fs=SR)
    return signal.oaconvolve(thinned, lowpass[None], "same")


dry = scene()
out = record(dry)
generate_wav(out)
```